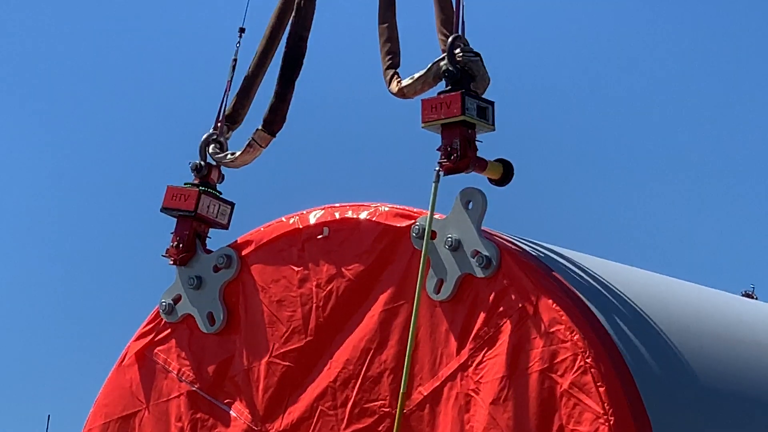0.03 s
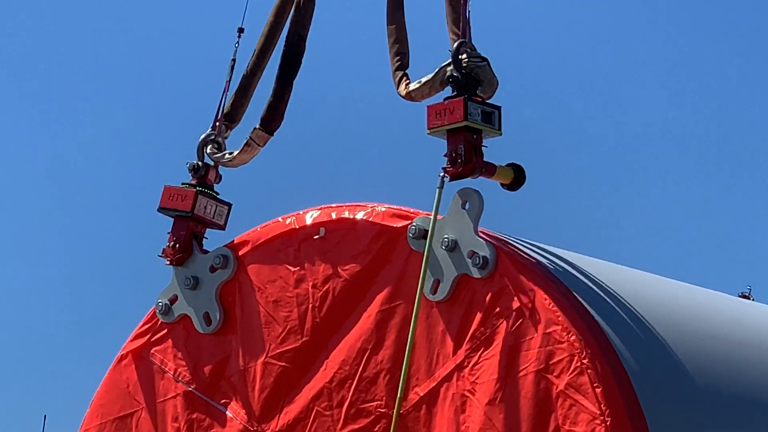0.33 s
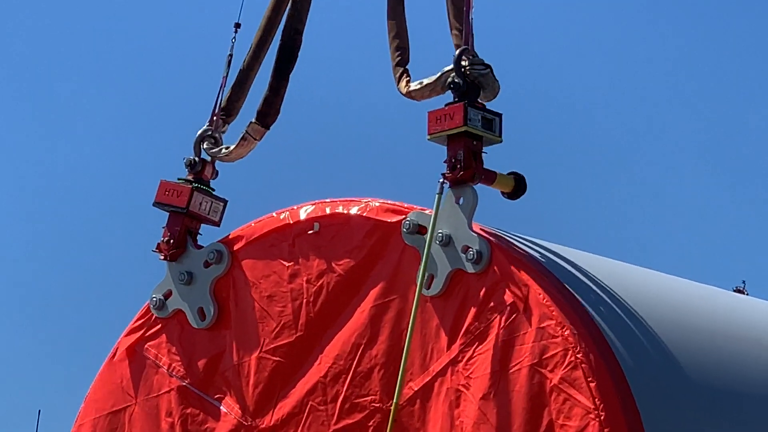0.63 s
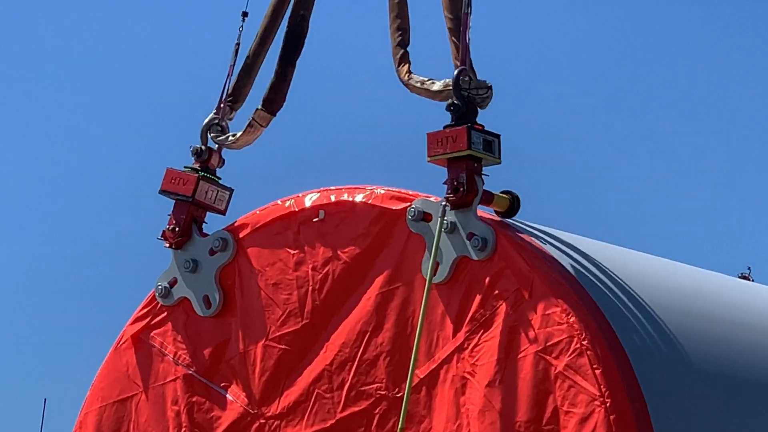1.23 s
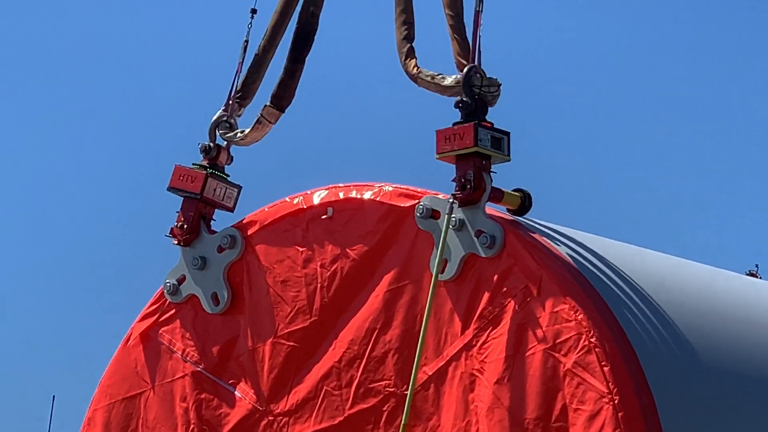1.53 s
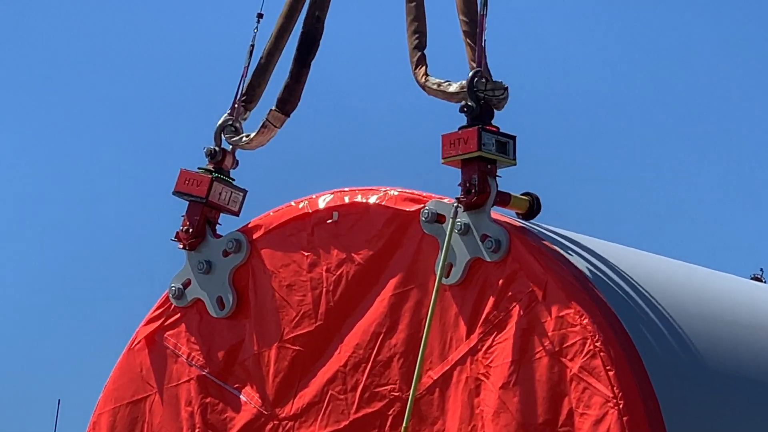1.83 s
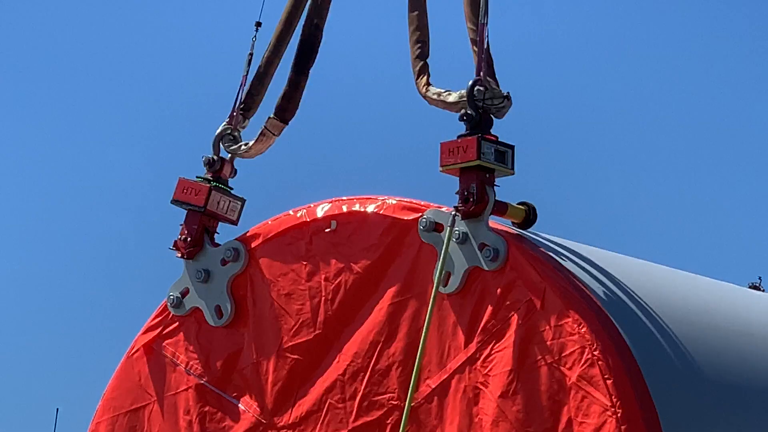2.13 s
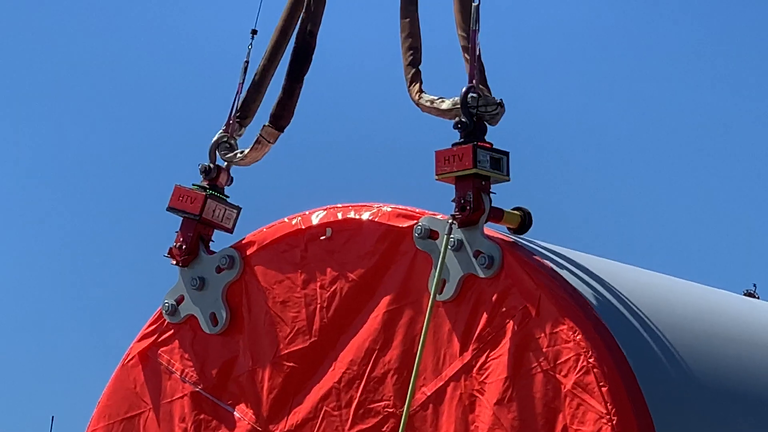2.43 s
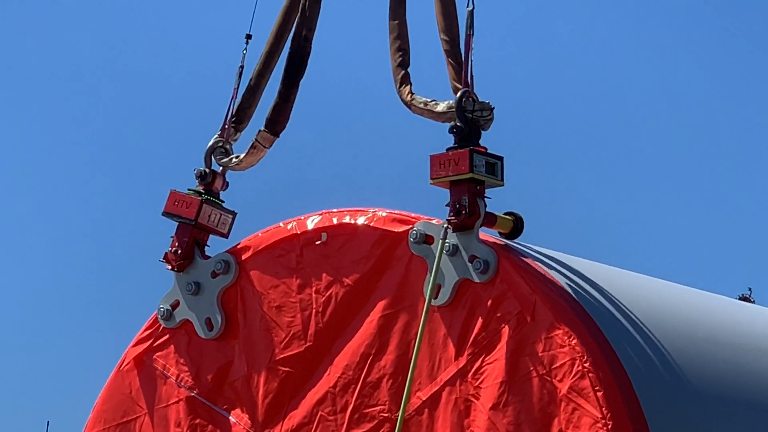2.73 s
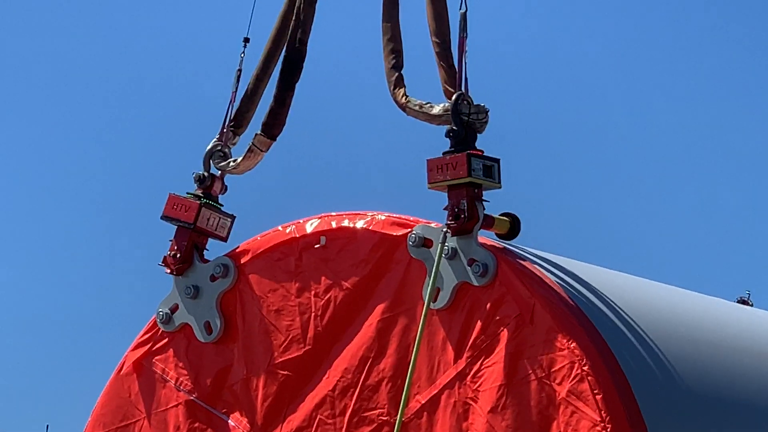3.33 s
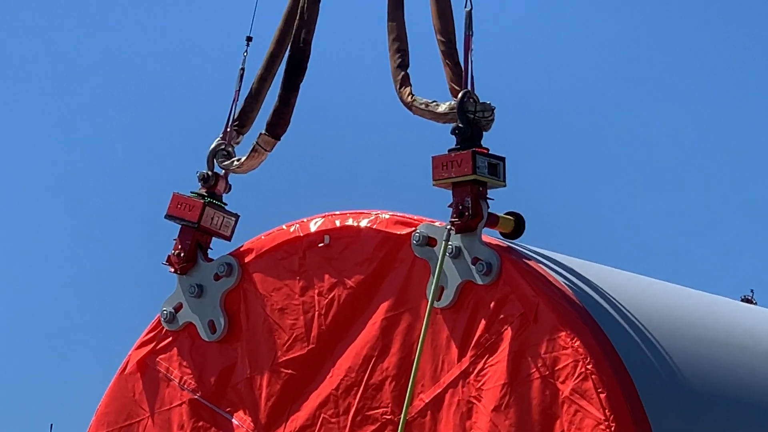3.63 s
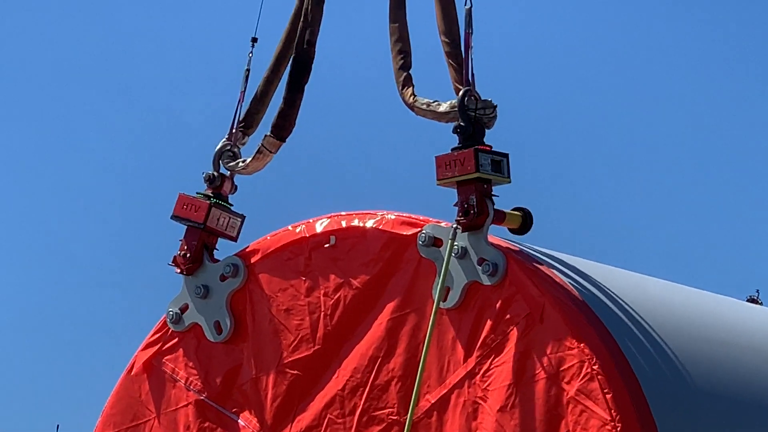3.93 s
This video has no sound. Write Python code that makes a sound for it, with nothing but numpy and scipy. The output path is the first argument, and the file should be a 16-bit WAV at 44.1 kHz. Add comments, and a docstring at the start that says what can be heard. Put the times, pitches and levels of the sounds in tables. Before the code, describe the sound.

A steel hook clanks onto a large hollow tube, booming dully over droning machinery.

```python
"""A steel hook lands on a hollow tube

Outdoors, a heavy lifting hook seats on the bracket of a large steel tube. It ticks on the way down,
then lands in one short rattling clank: each touch sets hook, latch and bracket ringing.
The tube booms dully after it, as many low notes ring together and die away.
Lifting machinery drones steadily to the left; a thin hiss comes from slightly right."""
import sys
import numpy as np
from scipy import signal
from scipy.fft import rfft, irfft
from scipy.io import wavfile

SR = 44100
rng = np.random.default_rng(int(sys.argv[2]) if len(sys.argv) > 2 else 0)


def waveform_to_disk(signal):
    """Save audio, clipped to [-1, 1], as 16-bit WAV at the path in sys.argv[1]."""
    frames = np.transpose(np.atleast_2d(signal))
    scaled = np.clip(frames, -1, 1) * 32767
    samples = np.round(scaled).astype(np.int16)
    wavfile.write(sys.argv[1], SR, samples)


N = 176400
TIME_S = np.arange(N) / SR
# How much sooner a sound reaches the left side than the right (negative: the right hears it first).
ROAR_LEAD_S, BOOM_LEAD_S, CLANK_LEAD_S = 0.00038, 0.00028, -0.000215


def from_db(db):
    """Turn decibels into a number to multiply by."""
    return 10 ** (np.asarray(db) / 20)


def rms_one(x):
    """Scale a signal so its average strength (rms) is 1."""
    return x / np.sqrt(np.mean(x ** 2) + 1e-20)


def sides(difference):
    """Split a left-minus-right difference over the two channels."""
    return np.array([[.5], [-.5]]) * difference


def gain_at(spectrum, hz):
    """Read the gain at any pitch from rows of pitch_hz, level_db."""
    pitches, levels_db = np.transpose(spectrum)
    return from_db(np.interp(np.log(hz + 1e-6), np.log(pitches), levels_db))


def drift(per_s):
    """A smooth random wobble, about 1 in size; a higher per_s makes it quicker."""
    pole = np.exp(-200 * np.pi * per_s / SR)
    slow = signal.lfilter([1], [1, -2 * pole, pole * pole], rng.standard_normal(N // 100 + 2002))[2000:]
    return np.interp(np.arange(N) / 100, np.arange(len(slow)), rms_one(slow))


def noise(spectrum, lead_s, diffuse):
    """Stereo noise: the share called diffuse comes from all around, the rest from one direction."""
    hz = np.arange(N // 2 + 1) * SR / N
    white = rfft(rng.standard_normal((3, N)))
    direct = white[0] * np.exp(2j * np.pi * hz * sides(lead_s))
    mixed = np.sqrt(1 - diffuse) * direct + np.sqrt(diffuse) * white[1:]
    return rms_one(irfft(mixed * gain_at(spectrum, hz), N))


def swell(curve):
    """Gain over time, from rows of time_s, level_db."""
    return from_db(np.interp(TIME_S, *np.transpose(curve)))


def bump(peak_s, half_length_s):
    """A smooth rise to 1 and back down."""
    return np.exp(-((TIME_S - peak_s) / half_length_s) ** 2)


def dying(fade_s):
    """A one-second curve that starts at 1 and drops 60 dB every fade_s."""
    return np.exp(-np.log(1000) * TIME_S[:SR] / fade_s)


def tones(table, pitch_wander=0.00212, waver_db=0.45):
    """Machine tones, each wavering a little in pitch and level."""
    out = 0
    for hz, db, lead_rad, pan_db in table:
        clock = TIME_S + pitch_wander * np.cumsum(drift(per_s=1.13)) / SR
        tone = np.sqrt(2) * np.sin(2 * np.pi * (hz * clock + rng.random()) + sides(lead_rad))
        out = out + tone * from_db(db + sides(pan_db) + waver_db * drift(per_s=0.35))
    return out


# Tone colour of the hiss: pitch_hz, relative_db
HISS_SPECTRUM = [(1200, -14), (2400, 13.5), (3500, 11), (4700, -0.5), (5800, 1.5), (7300, 1), (8600, 4.5),
                 (10500, 0.5), (12000, -7.5), (14000, -4), (16000, -15)]
def hiss():
    """A thin, even hiss from slightly right."""
    return from_db(-44.5) * noise(HISS_SPECTRUM, lead_s=-0.000215, diffuse=0.005)


# Tone colour of the rumble: pitch_hz, relative_db
RUMBLE_SPECTRUM = [(20, -33), (33, -21), (46, -15), (66, 1.5), (90, -9), (125, -10), (200, -7),
                   (275, -13.5), (420, -17), (600, -24.5), (1500, -79.5)]
def rumble():
    """The machinery's deep, steady noise."""
    return from_db(-26) * noise(RUMBLE_SPECTRUM, lead_s=0.000235, diffuse=0.02)


# Tone colour of the roar: pitch_hz, relative_db
ROAR_SPECTRUM = [(100, -35), (250, -19), (400, -10), (490, -3.5), (620, -1), (900, 0.5), (1150, -2.5),
                 (1500, -5.5), (1950, -4.5), (2300, -9), (2600, -14.5), (3200, -18.5), (4700, -20),
                 (6300, -42), (15000, -99)]
def engine_roar(level_db=-30.5, pan_db=1.46, flutter_db=0.68, firing_hz=74):
    """A rushing noise that pulses slightly each time the engine fires."""
    firing = 1 + 0.037 * np.sin(2 * np.pi * firing_hz * TIME_S)
    rush = noise(ROAR_SPECTRUM, ROAR_LEAD_S, diffuse=0.52)
    return rush * firing * from_db(level_db + sides(pan_db) + flutter_db * drift(per_s=2.9))


# The machinery's steady tones: pitch_hz, level_db, left_lead_rad, left_minus_right_db
HUM_TONES = [(50, -35, 0.2, 3), (79.5, -30, -0.08, -2), (138.1, -33, -0.3, -3.5), (157.4, -28.5, -1.4, 4.5),
             (191.4, -35.5, 0.57, -4.5), (203.4, -40.5, -0.8, -2), (214.8, -36.5, 2, -2.5),
             (238.4, -33, 0.86, -5.5), (246, -48, 2.2, -23), (275.5, -29.5, 1.01, 1.5),
             (640.4, -49, 1.9, 10.5), (817, -50.5, 1, 15.5), (1923, -59.5, 0.1, -27)]
def hum():
    """Many steady tones blend into one hum."""
    return tones(HUM_TONES)


def throb(pitch_hz=66.1, beat_hz=3.35, waver_db=2):
    """Two close bass tones add up, then partly cancel, about three times a second."""
    t = TIME_S - 0.17  # the two tones line up at this moment
    low = from_db(-31 + waver_db * drift(per_s=0.35)) * np.cos(2 * np.pi * pitch_hz * t)
    high = from_db(-36 + waver_db * drift(per_s=0.35)) * np.cos(2 * np.pi * (pitch_hz + beat_hz) * t)
    return np.sqrt(2) * (low + high)


# The drone's tones: pitch_hz, relative_db, left_lead_rad, left_minus_right_db
DRONE_TONES = [(495.2, -3, 1.64, 5.7), (526.5, -9.5, 1.7, 9.7)]
# How loud the drone is over time: time_s, level_db
DRONE_LOUDNESS = [(0, -29), (.9, -28.5), (1.6, -31), (2.2, -30), (2.6, -35.5), (3.05, -32), (4, -30)]
def drone(waver_db=1):
    """Two mid-pitched machine tones swell and fade together."""
    return swell(DRONE_LOUDNESS) * from_db(waver_db * drift(per_s=2)) * tones(DRONE_TONES)


# The whine's tones: pitch_hz, relative_db, left_lead_rad, left_minus_right_db
WHINE_TONES = [(1133, 1, 2.47, 5.5), (1114, -7, 2.15, 6.6)]
# How loud the whine is over time: time_s, level_db
WHINE_LOUDNESS = [(0, -49), (.55, -46), (1, -43), (1.5, -45), (2.1, -45), (2.4, -38.5), (2.65, -35),
                  (3.1, -42), (4, -44)]
def whine():
    """Two higher machine tones grow louder, then ease off."""
    return swell(WHINE_LOUDNESS) * tones(WHINE_TONES)


# Two brief whines and a squeak: peak_s, half_length_s, pitch_hz, glide_hz_per_s, level_db, jitter_share
SQUEAL_NOTES = [(2.52, .22, 2121, 40, -48, .002), (2.88, .18, 2266, 0, -46.5, .001),
                (2.255, .05, 8650, 1100, -55, .004)]
def squeals():
    """Thin, unsteady tones from the machinery come and go."""
    out = 0
    for peak_s, half_s, hz, glide, db, jitter in SQUEAL_NOTES:
        pitch_hz = (hz + glide * (TIME_S - peak_s)) * (1 + jitter * drift(per_s=60))
        cycles = np.cumsum(pitch_hz) / SR + hz * sides(ROAR_LEAD_S)
        out = out + from_db(db) * bump(peak_s, half_s) * np.sin(2 * np.pi * cycles)
    return out


# Tone colour of the thud: pitch_hz, relative_db
THUD_SPECTRUM = [(35, -25), (60, -4), (150, 12), (220, -22), (500, -44.5), (2000, -100)]
def thud():
    """A soft, low thud as the boom fades."""
    envelope = from_db(-23) * bump(peak_s=1.775, half_length_s=0.02)
    return envelope * noise(THUD_SPECTRUM, BOOM_LEAD_S, diffuse=0.02)


# How strongly the tube rings at each pitch: pitch_hz, relative_db
TUBE_SPECTRUM = [(80, 3.5), (170, 4), (260, 4), (310, -1.5), (360, 7), (415, 1), (470, 2), (530, -7),
                 (620, -8), (800, -17), (1200, -24)]
def tube_boom(start_s=1.222, rise_s=0.038, hold_s=0.19, fade_s=2.1, level_db=-20, count=260):
    """The blow spreads through the tube: many close low notes swell, hold and die away."""
    start = int(start_s * SR)
    t, out = TIME_S[:N - start], np.zeros((2, N))
    nudges, turns = rng.random((count, 2)).T
    scatter_rad = 0.32 * rng.standard_normal(count)  # widens the boom between left and right
    low_hz, high_hz = TUBE_SPECTRUM[0][0], TUBE_SPECTRUM[-1][0]
    pitches = low_hz + (high_hz - low_hz) * (np.arange(count) + nudges) / count
    for hz, turn, skew in zip(pitches, turns, scatter_rad):
        phase = 2 * np.pi * (hz * (t + sides(BOOM_LEAD_S)) + turn) + sides(skew)
        out[:, start:] += gain_at(TUBE_SPECTRUM, hz) * np.sin(phase.astype(np.float32))
    rise = np.minimum(t / rise_s, 1)
    fall = np.exp(-np.log(1000) * np.maximum(t - rise_s - hold_s, 0) / fade_s)
    out[:, start:] = from_db(level_db) * rise * fall * rms_one(out[:, start:])
    return out


# The tube's stand-out notes: peak_s, pitch_hz, level_db, half_length_s
TUBE_NOTES = [(1.282, 462, -21.5, 0.02), (1.297, 205, -20, 0.026), (1.317, 345, -20, 0.031),
              (1.365, 460, -25, 0.059), (1.394, 240, -20.5, 0.031), (1.48, 412, -25, 0.086)]
def tube_swells():
    """Single notes of the tube rise out of the boom in turn."""
    t = TIME_S + sides(BOOM_LEAD_S)
    return sum(from_db(db) * bump(peak_s, half_s) * np.sin(2 * np.pi * (hz * t + rng.random()))
               for peak_s, hz, db, half_s in TUBE_NOTES)


def ring(starts_s, levels_db, hz, fade_s, rise_s=0.002):
    """One natural note of the steel, set ringing by each touch."""
    t, out = TIME_S[:SR], np.zeros((2, N))
    envelope = np.minimum(t / rise_s, 1) * dying(fade_s)
    for start_s, db in zip(starts_s, levels_db):
        start = int(start_s * SR)
        cycles = hz * (t + sides(CLANK_LEAD_S)) + rng.random()
        out[:, start:start + SR] += from_db(db) * envelope * np.sin(2 * np.pi * cycles)
    return out


def scuffs(starts_s, levels_db, scuffs_s, spectrum):
    """A burst of noise for each touch: it starts at once, drops fast and leaves a short tail."""
    power = np.zeros(N)
    tail = from_db(-12.5) * dying(fade_s=0.2)
    for start_s, db, scuff_s in zip(starts_s, levels_db, scuffs_s):
        start = int(start_s * SR)
        power[start:start + SR] += from_db(db) ** 2 * (np.exp(-2 * TIME_S[:SR] / scuff_s) + tail ** 2)
    return np.sqrt(power) * noise(spectrum, CLANK_LEAD_S, diffuse=0.98)


# Tone colour of the latch's snap: pitch_hz, relative_db
SNAP_SPECTRUM = [(2000, -25), (5000, -8), (6300, -10), (8500, -3), (11000, -8), (13500, -3), (15500, -5)]
def latch_rattle(starts_s, levels_db, scuffs_s):
    """The hook's small latch snaps and rings with one high note."""
    snap = scuffs(starts_s, levels_db - 38, scuffs_s, SNAP_SPECTRUM)
    return snap + ring(starts_s, levels_db - 25, hz=6137, fade_s=0.042)


# The bracket's natural notes: pitch_hz, relative_db, fade_s
BRACKET_NOTES = [(4835, -33, .1), (4867, -37.5, .27), (4915, -33.5, .07)]
def bracket_ring(starts_s, levels_db):
    """The bracket rings brightly; its close notes beat against each other."""
    return sum(ring(starts_s, levels_db + db, hz, fade_s) for hz, db, fade_s in BRACKET_NOTES)


# Tone colour of the crack: pitch_hz, relative_db
CRACK_SPECTRUM = [(300, 6), (900, 3.5), (1800, 1), (3300, -2), (4500, -2), (5800, -6.5), (7500, -17.5),
                  (10000, -13), (15000, -68)]
def crack(starts_s, levels_db, scuffs_s):
    """The sharp noise of steel meeting steel."""
    return scuffs(starts_s, levels_db - 15.5, scuffs_s, CRACK_SPECTRUM)


# The hook's natural notes: pitch_hz, relative_db, fade_s
HOOK_NOTES = [(966, -5, .1), (1125, -3, 0.21), (1960, -3, .2), (2270, -5, .2), (2580, 3, 0.18),
              (2690, 2, 0.14), (2778, -1, .1), (3042, -8, 0.15), (3330, 2, .1), (3612, -1, .14),
              (4060, -4, 0.11), (4242, -9, .2), (6600, -14, 0.12), (9400, -15, 0.06)]
def hook_ring(starts_s, levels_db):
    """The struck hook rings briefly with many notes at once."""
    return sum(ring(starts_s, levels_db + db - 32, hz, fade_s) for hz, db, fade_s in HOOK_NOTES)


# Each touch of hook on bracket:
# start_s, strength_db, hook_extra_db, latch_extra_db, bracket_extra_db, scuff_s
TOUCHES = [(.6965, -16, 4, -9, -6, 0.0069), (.733, -23, 11, -18, -10, .009), (1.082, -11, 3, -11, -5, .006),
           (1.112, -21, 4, 2, -4, 0.0066), (1.192, -13, -4, 15, -3, .004), (1.2195, 2, 1, -13, -9, 0.0039),
           (1.225, -6, 0, -3, -12, 0.0023), (1.232, -4.5, -5, 12, -8, 0.0057), (1.2385, -1, 0, 3, -8, .005),
           (1.2435, -6.5, 3, -1, 11, 0.005), (1.252, -15, 0, -14, -14, 0.0099)]
def hook_landing(pan_db=1.2):
    """A few ticks, then a quick cluster of hits: each one cracks and rings hook, latch and bracket."""
    starts_s, strength_db, hook_db, latch_db, bracket_db, scuffs_s = np.transpose(TOUCHES)
    clank = crack(starts_s, strength_db, scuffs_s)
    clank += hook_ring(starts_s, strength_db + hook_db)
    clank += latch_rattle(starts_s, strength_db + latch_db, scuffs_s)
    clank += bracket_ring(starts_s, strength_db + bracket_db)
    return clank * from_db(sides(pan_db))


def scene():
    """Hook and tube over the steady background."""
    machinery = drone() + hum() + throb() + whine() + engine_roar() + rumble() + squeals()
    return machinery + hiss() + hook_landing() + tube_boom() + tube_swells() + thud()


def record(dry):
    """Cut away the very highest treble."""
    cutoff_hz = 15650
    return signal.sosfilt(signal.ellip(10, .1, 80, cutoff_hz, fs=SR, output="sos"), dry)


dry = scene()
out = record(dry)
waveform_to_disk(out)
```